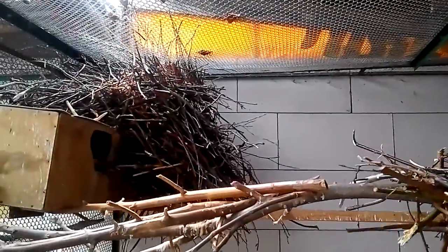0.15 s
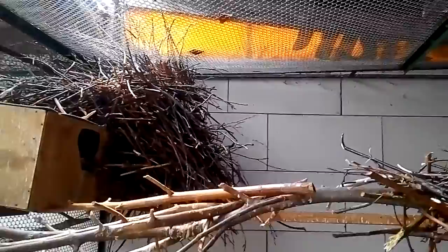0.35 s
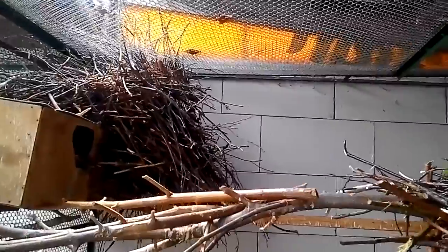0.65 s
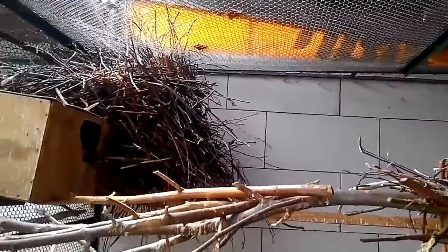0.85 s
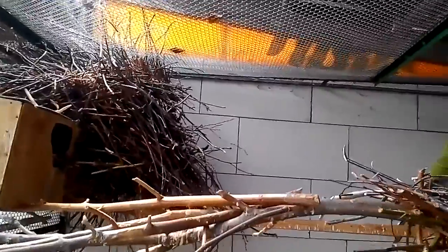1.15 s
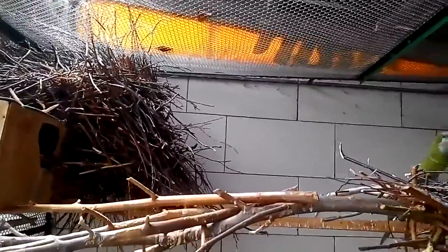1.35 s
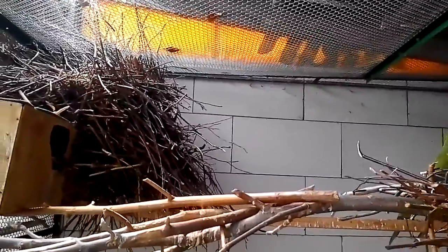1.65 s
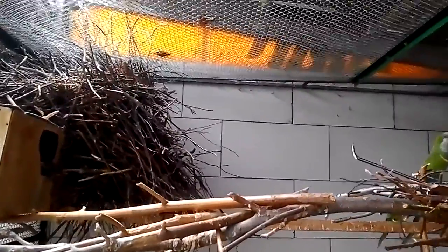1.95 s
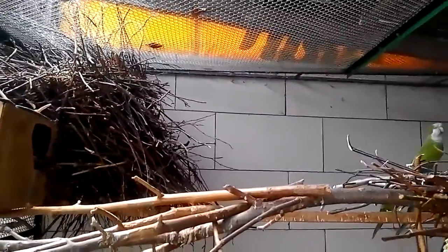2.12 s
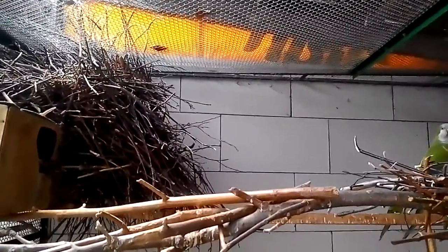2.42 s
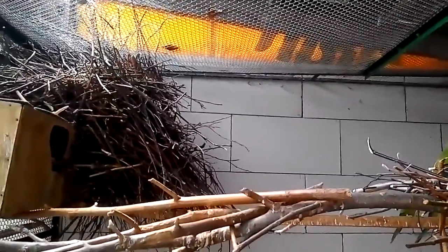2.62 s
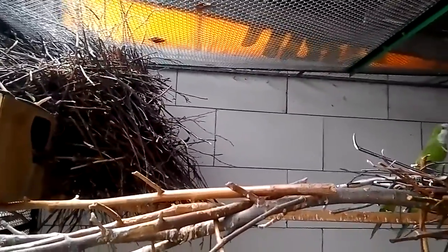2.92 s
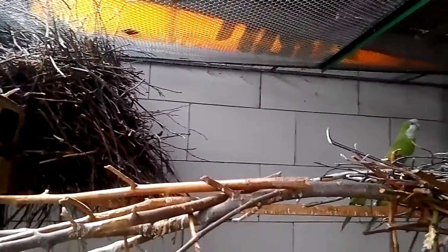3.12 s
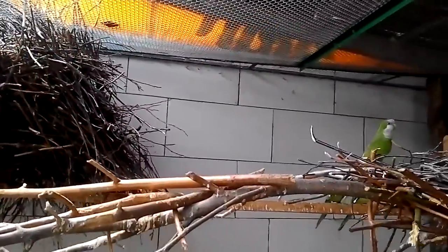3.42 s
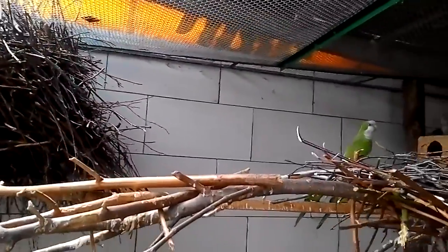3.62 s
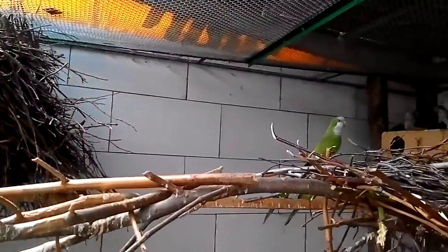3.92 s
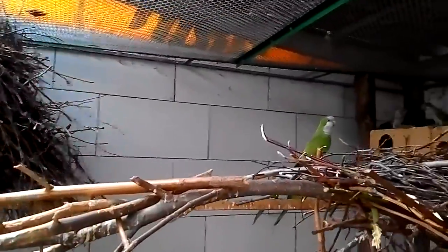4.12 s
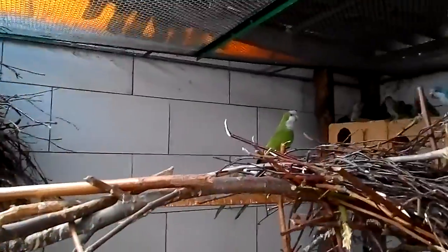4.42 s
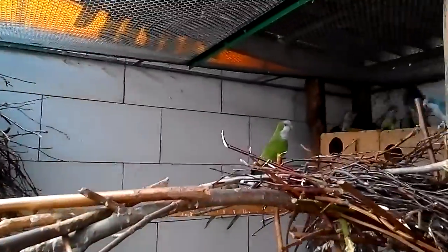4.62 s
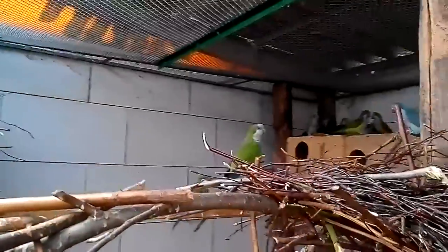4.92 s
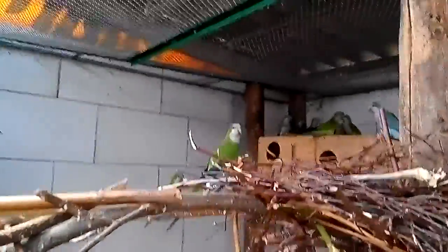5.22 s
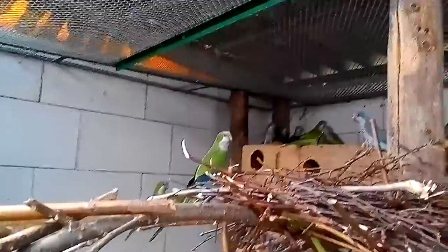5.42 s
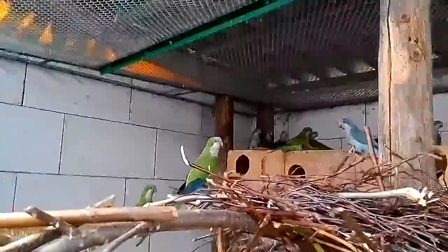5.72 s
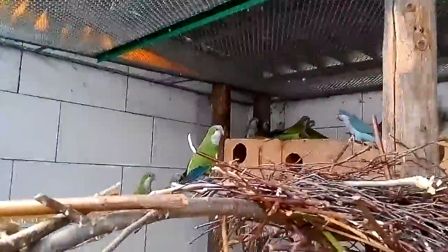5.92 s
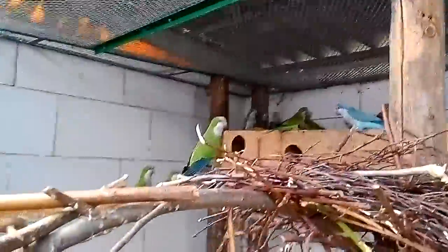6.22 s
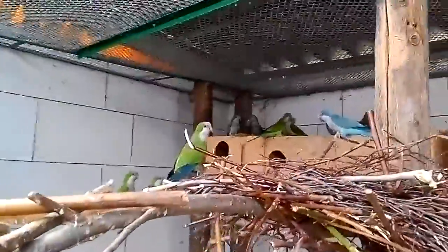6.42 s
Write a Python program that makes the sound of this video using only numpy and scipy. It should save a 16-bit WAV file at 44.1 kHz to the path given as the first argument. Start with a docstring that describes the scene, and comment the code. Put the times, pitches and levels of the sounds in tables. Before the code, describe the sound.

Harsh, buzzing squawks from parakeets come one right after another inside a small aviary with a brief echo. High chips cluster in the first half, quick yelps dot the calls throughout, and a longer rattling squawk comes last. Underneath are a faint steady hush and occasional soft knocks of birds shifting on wood. The birds are loud, the strongest calls straining the microphone a little.

```python
"""A flock of monk parakeets squawks without a pause in a small block-walled aviary.
Membranes in a bird's throat snap open and shut to make a hoarse buzz, and the throat shapes it.
Each squawk is a fast stutter of syllables; short yelps, thin chips and soft croons fall in between.
Perches knock faintly over a distant hush, the walls ring, and the loudest calls overload the microphone."""
import sys
import numpy as np
from scipy import signal
from scipy.fft import rfft, irfft, next_fast_len
from scipy.io import wavfile
from scipy.ndimage import uniform_filter1d, minimum_filter1d

SR = 44100
rng = np.random.default_rng(int(sys.argv[2]) if len(sys.argv) > 2 else 0)


def materialize(psi):
    """Save the field psi as 16-bit PCM at rate SR to the path in sys.argv[1].

    A 1-D psi becomes a single channel; in a 2-D psi each row is a channel.
    """
    bounded = np.clip(np.atleast_2d(psi).T, -1, 1)
    quanta = np.round(bounded * 32767).astype(np.int16)
    wavfile.write(sys.argv[1], SR, quanta)


N = 289296

# tone of the distant background: frequency_hz, gain_db
BACKGROUND_TONE = [(25, -15), (60, -14), (150, -6), (300, -10.5), (480, 1), (700, 3.5), (1200, 0),
                   (2300, -3), (4500, -4), (9000, -7), (15000, -33)]
# birds shifting on perches and nest boxes: start_s, level_db, decay_s (time to fall 60 dB)
PERCH_KNOCKS = [(.965, -36.5, 0.2), (1.615, -37.5, 0.22), (4.17, -32.5, 0.21), (4.21, -38, 0.34),
                (4.52, -42.5, 0.72), (6.04, -45, 0.5)]
# tone of the wood they land on: frequency_hz, gain_db
WOOD_TONE = [(60, -27), (150, -12), (215, 5.5), (320, -6), (450, 2), (900, 0), (2500, -18.5)]
# faint low notes between calls: start_s, length_s, pitch_hz, level_db
CROON_NOTES = [(0, 0.11, 488, -54), (1.61, 0.18, 441, -51.5), (2.27, .29, 483, -51), (3.05, .17, 455, -54)]
# tone of a parakeet's throat and open beak: frequency_hz, gain_db
THROAT_TONE = [(150, -47), (350, -36), (650, -23), (820, -21.5), (1020, -17.5), (1300, -18.5), (1850, -5),
               (2400, 0), (3300, -8), (4400, 1.26), (5300, -4), (6400, -3.5), (7700, -14.5), (9200, -11.5),
               (11800, -31), (15500, -46)]
# yelps and chips: start_s, length_s, start_pitch_hz, end_pitch_hz, level_db, tilt_db_per_octave,
#   roughness (0-1)
YELP_CALLS = [ (0.043, .022, 745, 850, -30.5, -6, 0.3), (0.059, 0.035, 850, 917, -21, -2, 0.32),
              (2.094, 0.023, 6600, 5900, -13, 0, 0.3), (2.105, 0.074, 950, 930, -18.5, -2, .2),
              (2.121, 0.021, 6500, 5790, -12, 0, 0.3), (2.147, .02, 6400, 5750, -11, 0, 0.26),
              (2.34, 0.022, 4050, 4237, -22.5, 0, 0.43), (2.406, 0.023, 4380, 4730, -18, -2, 0.1),
              (2.476, 0.023, 4480, 4470, -20.5, -2, .28), (2.505, 0.019, 6400, 6120, -23, 0, 0.54),
              (2.53, .055, 679, 730, -25.5, -2.5, .22), (2.955, .016, 6620, 5510, -10.5, 0, .12),
              (3.005, 0.013, 6610, 5520, -12.5, 2, 0.23), (3.08, 0.052, 600, 568, -34, -5.5, .5),
              (3.224, .024, 787, 822, -18.5, 0.5, 0.76), (3.575, 0.043, 641, 760, -19.5, 1.5, .15),
              (3.72, .05, 4950, 5010, -28.5, -2, 0.4), (3.807, 0.019, 565, 560, -22.5, -0.5, .82),
              (4.281, .046, 651, 790, -14.5, 2, .28), (4.314, 0.076, 610.5, 591.3, -13, 1.5, 0.43),
              (4.512, .062, 937, 986, -21.5, -8.5, .25), (4.755, 0.031, 716, 699, -13, 2, 0.31),
              (4.969, .085, 649, 619, -14.5, 1, 0.43), (5.16, 0.057, 553, 653, -24, -5, .24),
              (5.365, 0.068, 681, 720, -21, -1, 0.25), (5.832, 0.048, 2063, 2460, -24, 2.5, 0.34)]
# high ringing notes of the throat that break into brief squeals: pitch_hz, level_db
SQUEAL_NOTES = [(4450, -6), (6350, -4.5), (9200, -13.5)]
# breath pressure through one syllable: share_of_syllable, share_of_stutter_depth
SYLLABLE_BREATH = [(0, -.95), (.09, -0.24), (.5, 0.0098), (.78, -.7), (1, -0.69)]
# the squawks: start_s, length_s, swell_s, swell_db, release_s, level_db, brightness_db, syllables_per_s,
#   stutter_depth_db, start_pitch_hz, end_pitch_hz (both at full effort), roughness (0-1)
SQUAWK_CALLS = [ (0.111, .40, 0.22, 12, .08, -20.5, 4.5, 40, 6, 751.3, 621.5, 0.79),
                (0.474, 0.2, 0.017, 1.5, 0.072, -26, 5, 30, 5, 615.7, 606, 0.41),
                (.709, .42, .2, 19, .15, -17, 2, 35.7, 8, 808.3, 907, 0.49),
                (1.094, 0.17, .1, 4, .016, -33.5, 1.8, 32.6, 11.5, 731, 682, 0.71),
                (1.243, 0.12, 0.089, 4, 0.013, -25.5, -2.2, 31, 8, 706, 702, 0.58),
                (1.363, 0.24, 0.27, 5, 0.0065, -15.8, -3.5, 33, 16, 787.7, 788, 0.16),
                (1.716, .19, .12, 13, .023, -18.5, 5, 44, 7.5, 851, 799, 0.71),
                (1.884, 0.18, 0.22, 5, .007, -14, -2.5, 32, 14, 770, 822, 0.21),
                (2.03, 0.3, 0.028, 3, .24, -15.5, 5, 34.7, 6, 839, 840, 0.83),
                (2.509, 0.35, .22, 15, 0.049, -16, 5, 37.6, 7, 801, 891, 0.65),
                (2.850, 0.23, 0.077, 8, 0.079, -15, 3, 38.2, 7, 849.7, 887, 0.68),
                (3.189, 0.39, .14, 16, 0.028, -16.5, 4.5, 35.6, 9, 889, 980, 0.31),
                (3.574, 0.15, .01, 1.5, 0.13, -20, 5.5, 30, 3, 750.4, 800, 0.8),
                (3.746, .563, .46, 16, 0.086, -16, 4.5, 33.5, 7, 799.4, 847.2, .58),
                (4.399, 0.13, 0.031, 2, 0.0058, -26.5, 2.5, 37.5, 6, 696, 689, 0.67),
                (4.521, 0.23, .19, 3, .015, -20, 2, 30, 6, 640, 605, .6),
                (4.752, .2, 0.0084, 0, 0.061, -19.9, 3.1, 29, 9, 616, 601, 0.59),
                (5.118, .27, .12, 11, .13, -22.5, 1, 42, 3.5, 609, 738.5, 0.63),
                (5.344, .51, .31, 9, 0.16, -19, 4.3, 30.1, 5, 790.3, 960, .55),
                (5.876, 0.72, .33, 13, 0.0092, -21.5, 1.5, 34, 10, 629.5, 607.7, .33)]

TOP_HZ = 15600  # upper edge of the treble


def undb(db):
    """Turn decibels into a number to multiply by."""
    return 10 ** (np.asarray(db) / 20)


def unit(x):
    """Scale a signal to an average strength (rms) of one."""
    return x / np.sqrt(np.mean(x ** 2) + 1e-18)


def colour(x, points):
    """Shape a sound's tone with a curve of (frequency_hz, gain_db) points."""
    hz, db = np.transpose(points)
    size = next_fast_len(len(x) + 1024)
    bin_hz = np.maximum(np.arange(size // 2 + 1) * SR / size, 1)
    gain = undb(np.interp(np.log(bin_hz), np.log(hz), db))
    return irfft(rfft(x, size) * gain, size)[:len(x)]


def lowpass(x, hz, order=2):
    """Keep what lies below hz, without delaying it."""
    return signal.sosfiltfilt(signal.butter(order, min(hz, .45 * SR), fs=SR, output="sos"), x)


def wander(count, hz):
    """A random drift of about size one that turns about hz times a second."""
    place = np.arange(count) * hz / SR
    knots = rng.standard_normal(count)
    return unit(np.interp(place, np.arange(count), knots))


def add(out, start_s, x):
    """Mix a sound in at its start time."""
    i = max(int(start_s * SR), 0)
    out[i:i + len(x)] += x[:max(len(out) - i, 0)]


def fade(t, length_s, rise_s, fall_s):
    """Fade in, hold, and fade out."""
    return np.clip(t / rise_s, 0, 1) * np.clip((length_s - t) / fall_s, 0, 1)


def die_away(t, decay_s):
    """A level that falls 60 dB in decay_s."""
    return np.exp(-np.log(1000) * t / decay_s)


def whistle(hz):
    """A pure tone that follows a pitch."""
    return unit(np.sin(2 * np.pi * np.cumsum(hz) / SR))


def background(level_db=-46, waver_db=.79):
    """Faint wavering noise from further off."""
    hush = unit(colour(rng.standard_normal(N), BACKGROUND_TONE))
    return hush * undb(level_db + waver_db * wander(N, 5.35))


def aviary(x, decay_s=.44, treble_decay_s=.26, tail_db=-10):
    """Sound bouncing between the walls leaves a short tail whose treble dies first."""
    t = np.arange(SR // 2) / SR
    noise = rng.standard_normal(len(t))
    low = lowpass(noise, 4600)
    tail = low * die_away(t, decay_s) + (noise - low) * die_away(t, treble_decay_s)
    tail *= np.clip(t / .014, 0, 1)
    return x + undb(tail_db) * signal.fftconvolve(x, tail / np.linalg.norm(tail))[:N]


def near_echoes(x, spread_s=.016, echo_db=-4.5):
    """Quick echoes off the nearest wall, boxes and roof; every call gets its own."""
    echoes = np.zeros(int(spread_s * SR))
    for lag, strength in zip(rng.random(size=40), rng.standard_normal(size=40)):
        echoes[int(lag * len(echoes))] += strength * np.exp(-lag)
    response = undb(echo_db) * echoes / np.linalg.norm(echoes)
    response[0] = 1  # the sound that arrives directly
    return signal.fftconvolve(x, response / np.linalg.norm(response))


def perches():
    """Shifting birds make soft, dull knocks on wood."""
    out = np.zeros(N)
    t = np.arange(SR // 2) / SR
    for start_s, level_db, decay_s in PERCH_KNOCKS:
        wood = unit(colour(rng.standard_normal(len(t)), WOOD_TONE))
        add(out, start_s, wood * undb(level_db) * die_away(t, decay_s))
    return out


def croon(length_s, pitch_hz, waver=.09):
    """A soft, wavering low note."""
    t = np.arange(int(length_s * SR)) / SR
    hz = pitch_hz * (1 + waver * wander(len(t), 132.8))
    return unit(whistle(hz) * fade(t, length_s, rise_s=.017, fall_s=.027))


def voice_box(hz, rough, jitter=.085, shimmer=.49, rasp=.2, breathiness=1.66):
    """Membranes snap once a cycle; driven hard, their timing and force go wild and air tears through."""
    count, rough = len(hz), np.clip(rough, 0, 1)
    shaky_hz = hz * (1 + jitter * rough * wander(count, 900))
    phase = 2 * np.pi * np.cumsum(shaky_hz) / SR
    harmonics = range(1, int(TOP_HZ / hz.mean()) + 1)
    # the snap takes a moment, so its overtones arrive slightly spread out
    pulses = unit(sum(np.cos(k * phase + k * k / 10) for k in harmonics))
    force = 1 + shimmer * rough * wander(count, 1100)
    air = unit((1 + np.cos(phase) / 2) * rng.standard_normal(count))
    # the membranes catch and let go every few milliseconds
    rattle = np.exp(rasp * rough * wander(count, 330))
    return unit((pulses * force + breathiness * rough * air) * rattle)


def yelp(length_s, pitch_ends_hz, tilt_db, rough, arch_per_s=2.3):
    """One unbroken note that glides and arches in pitch; a half-shut beak makes it darker."""
    t = np.arange(int(length_s * SR)) / SR
    arch = 1 + arch_per_s * length_s * np.sin(np.pi * t / length_s)  # longer yelps arch higher
    hz = np.interp(t, [0, length_s], pitch_ends_hz) * arch
    throat = [(f, db + tilt_db * np.log2(max(f / min(pitch_ends_hz), 1))) for f, db in THROAT_TONE]
    voice = colour(voice_box(hz, rough), throat)
    return unit(voice * fade(t, length_s, rise_s=.25 * length_s, fall_s=.36 * length_s))


def squeals(pitch_ratio, stray=.04, jitter=.03, flare_db=3.5):
    """Short whistles that flare up and stray around the throat's high ringing notes."""
    count = len(pitch_ratio)
    out = np.zeros(count)
    for hz, db in SQUEAL_NOTES:
        bend = pitch_ratio + stray * wander(count, 55) + jitter * wander(count, 800)
        flare = undb(flare_db * wander(count, 149.1))
        out += undb(db) * unit(whistle(hz * bend) * flare)
    return out


def effort(t, length_s, swell_s, swell_db, release_s, release_db=24):
    """How hard the bird pushes, in dB from full voice: it swells, then lets go, slowly at first."""
    swell_left = np.clip(1 - t / swell_s, 0, 1)
    released = np.clip(1 - (length_s - t) / release_s, 0, 1)
    return -swell_db * swell_left ** 2 - release_db * released ** 1.7


def squawk(call, sag_per_db=.0135, least_rough=.383, ring_hz=2450, split_hz=3400):
    """A stutter of syllables: each starts suddenly and bright, then sags in pitch and dies away."""
    length_s, swell_s, swell_db, release_s, level_db, bright_db, rate_hz, depth_db, *ends_hz, rough = call
    t = np.arange(int(length_s * SR)) / SR
    effort_db = effort(t, length_s, swell_s, swell_db, release_s)
    # less effort makes the voice lower and duller
    glide_hz = np.interp(t, [0, length_s], ends_hz) * (1 + .007 * effort_db)
    treble_gain = undb(bright_db + .35 * effort_db)
    beat = (t * rate_hz + .08 * rough * wander(len(t), 20)) % 1  # runs 0 to 1 in each syllable
    pressure = undb(depth_db * np.interp(beat, *np.transpose(SYLLABLE_BREATH)))
    # the deeper the stutter, the further each syllable falls
    sag = 1 + sag_per_db * depth_db * (.35 - beat)
    hz = glide_hz * (sag + .018 * wander(len(t), 45))
    # higher calls come from a shorter throat
    throat_shift = (glide_hz / 750) ** .1
    throat = [(f * throat_shift.mean(), db) for f, db in THROAT_TONE]
    voice = colour(voice_box(hz, least_rough + (1 - least_rough) * rough), throat)
    low = lowpass(voice, split_hz, order=4)
    # the throat locks on to one overtone, which rings as a falling chirp, most of all in clear calls
    harmonic = round(ring_hz / np.mean(ends_hz))
    chirp = whistle(harmonic * hz * (1 + .0546 * rough * wander(len(t), 700)))
    ring = 2.34 * (1 - rough) ** 1.95 * chirp
    clear = (1 - rough) ** 3
    octave_up = 1.26 * clear * unit(chirp ** 2 - 1)  # squaring doubles the pitch
    squeal = np.sqrt(1 - clear) * squeals(np.sqrt(sag) * throat_shift)
    treble = unit(voice - low) + squeal + octave_up
    # the treble is strongest early in each syllable
    treble = unit(treble * pressure ** .49 * undb(-.55 * depth_db * beat))
    body = unit((unit(low) + ring) * pressure)
    loudness = undb(level_db + effort_db) * fade(t, length_s, rise_s=.0012, fall_s=.007)
    return (body + treble * treble_gain) * loudness


def flock():
    """All the birds' calls, each at its own time."""
    out = np.zeros(N)
    for start_s, *call in SQUAWK_CALLS:
        add(out, start_s, near_echoes(squawk(call)))
    for start_s, length_s, *pitch_ends_hz, level_db, tilt_db, rough in YELP_CALLS:
        note = yelp(length_s, pitch_ends_hz, tilt_db, rough)
        add(out, start_s, undb(level_db) * near_echoes(note))
    for start_s, length_s, pitch_hz, level_db in CROON_NOTES:
        add(out, start_s, undb(level_db) * croon(length_s, pitch_hz))
    return out


def scene():
    """Birds and perches inside the aviary, over the background, in one channel."""
    return (aviary(flock() + perches()) + background())[None]


def record(dry, limit=1.21):
    """A fast limiter turns the loudest screeches down; what still overloads clips, and the top is cut."""
    window = SR // 700  # about 1.4 ms
    needed_gain = np.minimum(1, limit / (np.abs(dry) + 1e-9))
    smooth_gain = uniform_filter1d(minimum_filter1d(needed_gain, window), window)
    clipped = np.clip(dry * smooth_gain, -1, 1)
    return signal.sosfilt(signal.ellip(10, .1, 60, TOP_HZ, fs=SR, output="sos"), clipped)


dry = scene()
out = record(dry)
materialize(out)
```